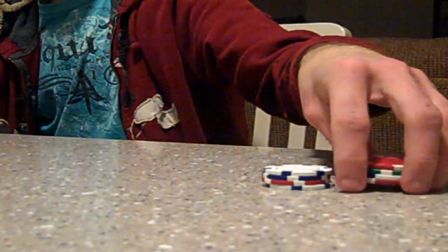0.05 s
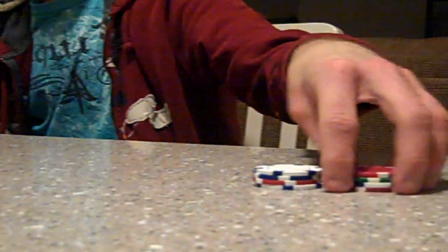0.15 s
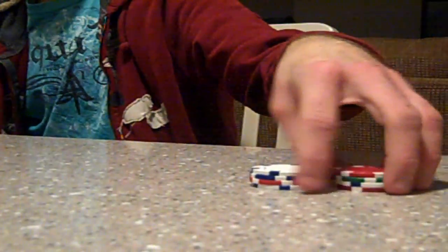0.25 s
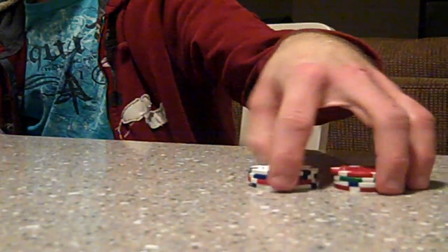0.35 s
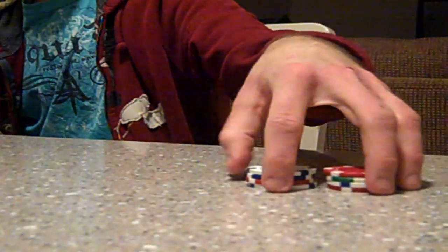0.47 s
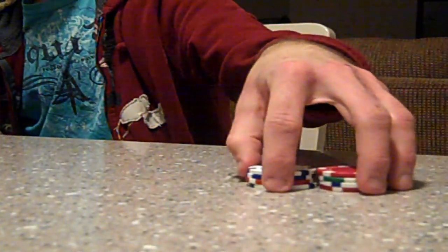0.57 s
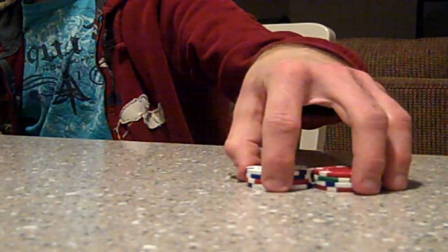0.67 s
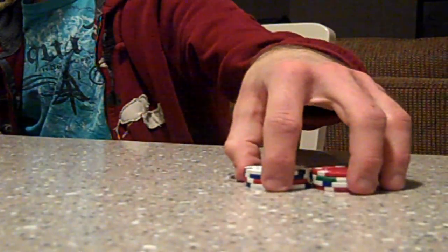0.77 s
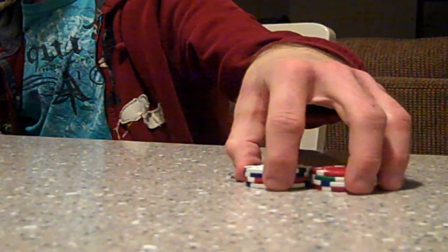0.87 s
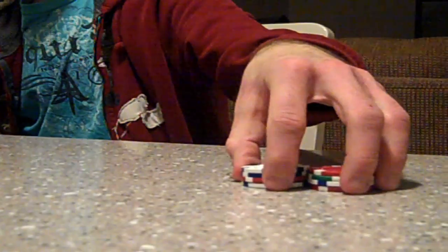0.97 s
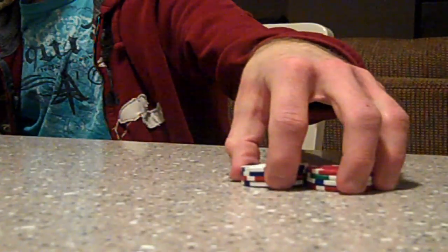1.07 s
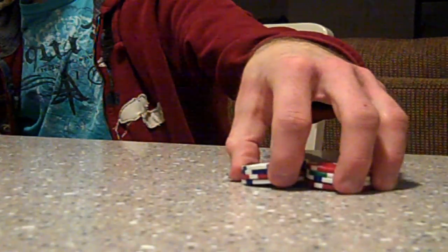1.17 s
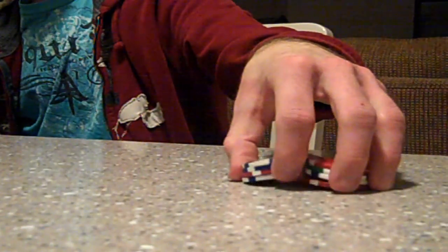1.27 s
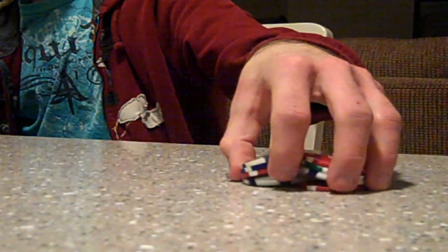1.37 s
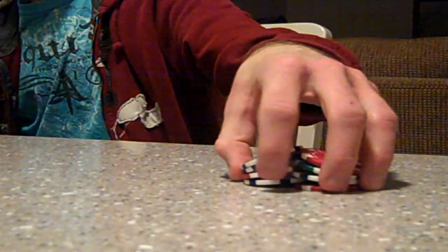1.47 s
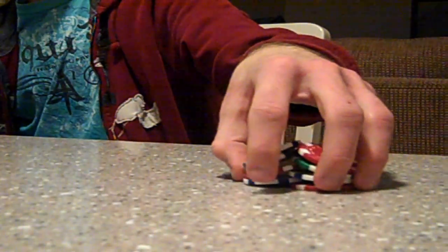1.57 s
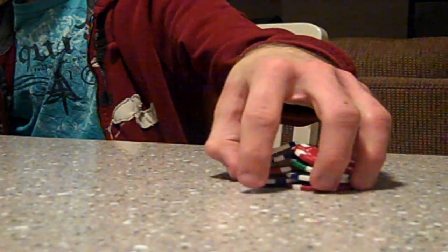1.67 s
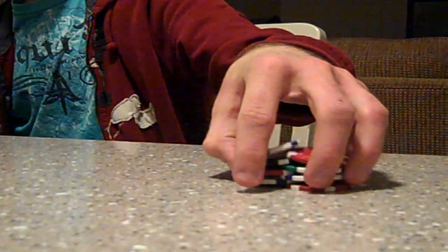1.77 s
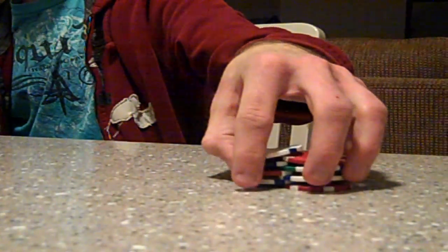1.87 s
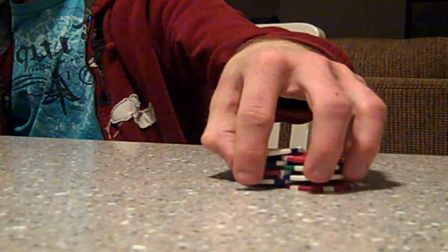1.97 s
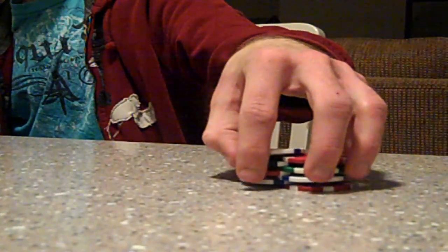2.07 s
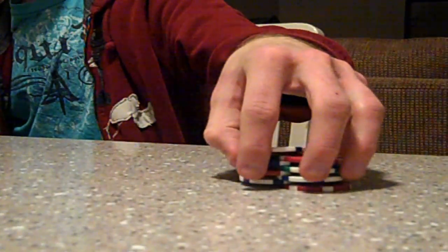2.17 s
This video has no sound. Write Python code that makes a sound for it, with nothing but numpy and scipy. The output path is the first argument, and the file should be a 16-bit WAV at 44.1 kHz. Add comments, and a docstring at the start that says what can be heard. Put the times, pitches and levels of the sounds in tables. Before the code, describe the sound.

Poker chips clatter sharply onto a hard tabletop, then clack and shuffle together with dull knocks

```python
"""Plastic poker chips in two short stacks, shuffled by a hand on a hard tabletop close to the microphone.
A few chips drop with a loud clatter; the stacks are nudged, lifted and clack into each other, then are
pushed together with duller knocks. Each contact is a noise crack, a hollow pop and damped sines for chip
and table; rubs are swarms of tiny contacts, bumps are deep table modes and rim ticks are filtered noise.
A small room rings on over steady hiss, and the loudest clacks overload the recorder."""
import sys
import numpy as np
from scipy import signal
from scipy.fft import rfft, irfft
from scipy.io import wavfile

SR = 44100
rng = np.random.default_rng(int(sys.argv[2]) if len(sys.argv) > 2 else 0)


def store_pcm(level_fs):
    """Save levels as 16-bit WAV."""
    pcm = np.round(np.clip(level_fs, -1, 1) * 32767).astype(np.int16)
    wavfile.write(sys.argv[1], SR, np.atleast_2d(pcm).T)


N = 97020
RING_SAMPLES = SR // 3

# Room tone and hiss. Each row: frequency in Hz, relative density in dB per Hz.
HUSH_SPECTRUM = [(25, 9), (45, 5), (70, 0.5), (100, 4), (140, 5.5), (200, 1.5), (300, -2.5), (450, -5.5),
                 (650, -5.5), (1000, -9.5), (2000, -12.5), (4000, -17.5), (8000, -20), (14000, -27)]
HUSH_DB = -54

# A rim just grazes another. Each row: start in seconds, level in dB.
RIM_TICKS = [(.1505, -28.5), (.1735, -57)]
TICK_LOW_HZ, TICK_HIGH_HZ, TICK_T60_S = 7000, 12500, .008

# Colour of the room's tail. Each row: frequency in Hz, relative level in dB.
ROOM_COLOUR = [(80, -1), (250, 3.5), (650, 0), (1200, 3), (2000, -4.5), (3500, -4), (5000, -0.5),
               (7500, -4.5), (10000, 1.5), (14000, -3.5)]
# Decay of the room's tail. Each row: frequency in Hz, t60 in seconds.
ROOM_DECAY = [(100, 0.53), (700, 0.74), (2000, .58), (5000, .56), (8000, .52), (10000, 0.32), (13000, 0.4)]
ROOM_DB, ROOM_FADE_IN_S = -18.5, .005
EARLY_DB, EARLY_T60_S, EARLY_DELAY_S = -11.5, 0.058, 0.0023

# Loose chips drop on their stack. Each row: start in seconds, level in dB, contact brightness in Hz,
# table knock in dB relative to the level, pitch of the pop in Hz.
CHIP_DROPS = [(.2108, -30, 6033, -7, 1850), (.2132, 9, 4500, -15.5, 1934), (.2150, 9, 13000, -14, 6540),
              (.2166, 1, 13000, -10, 6980), (.2195, -7, 9000, -7, 4522), (.2238, -4.5, 8000, -5.5, 2590),
              (.2250, 7, 6000, -11, 1936), (.2290, -3.5, 7000, -1.5, 2800), (.2327, -0.5, 12000, -10, 7005),
              (.2347, -11.5, 8970, -6.5, 2000), (.2381, 0.5, 12000, -11.5, 6860),
              (.2410, -8, 10000, -7.5, 4700)]
# Chips held in the fingers clack together. Each row: start in seconds, level in dB,
# contact brightness in Hz, table knock in dB relative to the level, pitch of the pop in Hz.
HELD_CLACKS = [(.7110, -37.5, 1817, 10, 908), (.7600, -31, 1300, 3.5, 649), (.7760, -38, 1305, 2, 650),
               (1.2280, -39, 2000, 0, 1070), (1.4050, -35.5, 1800, -3, 1950), (1.4331, 3.5, 3540, -8, 2534),
               (1.4341, -3, 7300, 0.5, 6390), (1.4364, -12, 2490, 2, 2250), (1.4470, -32, 4000, 18.5, 650),
               (1.4595, -33, 8060, 9, 5000), (1.4692, -27, 11000, -9, 7800), (1.4840, -32, 3000, 12, 650),
               (1.4963, 3, 8500, -20, 1590), (1.4980, 5, 11000, -11, 7390), (1.5003, -7, 11000, -1.5, 4920),
               (1.5110, -25.5, 7000, 13.5, 5240), (1.5272, -2, 7000, -5.5, 2840),
               (1.5283, 0.5, 7000, -13, 5800), (1.5333, -9.5, 8000, 0.5, 5280),
               (1.5400, -17, 9000, 0, 5600), (1.6385, -23, 1860, 9.5, 1880), (1.6845, -24.5, 2200, 3, 2010),
               (1.8092, -11.5, 1600, -2.5, 2060), (1.8160, -13.5, 4110, 1.5, 1885),
               (1.8225, -19.5, 2760, -5, 1960), (1.8380, -45, 6000, -2, 5200),
               (1.8458, -10.5, 3990, 3, 1536), (1.8470, -11, 4500, -17, 2910),
               (1.8495, -12, 2000, -3, 1700), (1.8648, -17.5, 4840, 3, 1850),
               (1.8762, -21, 5020, 12.5, 4450), (1.9161, -8, 3170, -0.5, 1883),
               (1.9225, -17.5, 2300, 1, 2250), (1.9680, -39, 2000, 13, 1800), (2.0270, -34, 1500, 7, 700),
               (2.0825, -36, 2000, -4, 1880), (2.1080, -38, 2180, 12.5, 1980),
               (2.1212, -13.5, 3140, -4.5, 2790), (2.1280, -17.5, 2520, -1, 2610),
               (2.1870, -27.5, 1800, 0.5, 1700)]
# Chips rub on each other and on the table. Each row: start in seconds, length in seconds, level in dB,
# contact brightness in Hz, table knock in dB relative to the level, pitch of the pop in Hz.
CHIP_RUBS = [(0.59, .035, -57, 3000, -6, 2310), (.950, 0.033, -51.5, 9000, 4.5, 2240),
             (1.161, 0.023, -57, 4000, 1, 2050), (1.359, .03, -51, 1500, 2, 1200),
             (1.384, 0.041, -45.5, 1600, 7.5, 1900), (1.444, 0.15, -45.5, 5000, 13, 5100),
             (1.633, 0.048, -36.5, 2010, -1, 1920), (1.803, 0.097, -32.5, 3800, 3.5, 2010),
             (1.929, 0.039, -45.5, 2200, 4, 2000), (2.118, 0.059, -43, 2190, 0, 1840)]
GRAINS_PER_S, GRAIN_SPREAD_DB = 1400, 5   # density over all rubbing chips, spread of grain level
# Fingers and stacks bump the table dully. Each row: start in seconds, level in dB.
TABLE_BUMPS = [(.850, -46), (1.124, -50.5), (1.223, -58), (1.436, -30.5), (1.528, -30.5), (1.660, -37),
               (1.917, -22), (1.961, -32), (2.085, -39), (2.122, -26.5), (2.177, -35.5)]

# Modes are nominal: every blow varies their pitch and level.
# Modes of a loose chip. Each row: frequency in Hz, level in dB, t60 in seconds.
LOOSE_CHIP_MODES = [(1780, -17.5, 0.0092), (1897, -16, 0.0093), (2430, -15.5, 0.019), (2843, -13.5, .012),
                    (3450, -14, 0.0069), (4410, -15, .009), (5100, -14, 0.016), (5510, -16.5, 0.0091),
                    (6062, -6.5, 0.013), (6712, -7.5, 0.019), (7326, -4.5, .02), (7720, -3, 0.01),
                    (8745, -13.5, 0.01), (9900, -13, 0.0074), (11850, -13.5, 0.0074), (12770, -16.5, 0.011)]
# Modes of a chip held in the fingers. Each row: frequency in Hz, level in dB, t60 in seconds.
HELD_CHIP_MODES = [(1360, -29, 0.039), (1658, -17, 0.0096), (2000, -14.5, 0.023), (2477, -15.5, 0.016),
                   (3026, -15.5, 0.01), (4500, -25, 0.0059), (5173, -9, 0.014), (5667, -9.5, 0.018),
                   (6100, -9, 0.0094), (7607, -8.5, .02), (7980, -6.5, 0.008), (8250, -16, 0.004),
                   (9900, -15.5, 0.011), (10700, -13.5, 0.0053)]
# Table modes that ring in a knock. Each row: frequency in Hz, level in dB, t60 in seconds.
TABLE_KNOCK_MODES = [(140.7, -41.5, .2), (224.5, -32.5, 0.064), (337, -32, .06), (363, -29.5, 0.082),
                     (477, -23, 0.052), (557, -15, 0.021), (624, -24.5, 0.18), (694, -17.5, 0.033),
                     (765, -22, .04), (900, -22.5, 0.032), (1075, -25.5, 0.043)]
# Deep modes of the table. Each row: frequency in Hz, level in dB, t60 in seconds.
TABLE_DEEP_MODES = [(98, -22.5, .2), (144, -13, 0.17), (187, -11, 0.088), (218.4, -5.5, 0.062),
                    (287, -5, .06), (361.2, -12, 0.25)]
MODE_SPREAD_DB, DETUNE = 2.0, .035   # each contact lands on a different spot; detune is a fraction

CRACK_DB, CRACK_T60_S = -9, .005   # the burst at the moment of contact
POP_DB, POP_T60_S = -5.5, .012   # the short hollow pop of two flat faces meeting
HOLLOW_HZ, HOLLOW_Q = 3833, 10   # a chip radiates poorly between its low and high modes
DISC_LOW_HZ = 616   # a small disc radiates little bass

MIC_TOP_HZ, MIC_LOW_HZ, CUTOFF_HZ = 14300, 95, 16500
OVERLOAD, OVERLOAD_KNEE = 1.0, 8   # ceiling in amplitude; a higher knee bends more sharply


def from_db(db):
    """Decibels to gain."""
    return 10 ** (np.asarray(db) / 20)


def at_hz(points, hz):
    """Read a table on a log-frequency axis."""
    f, value = np.transpose(points)
    return np.interp(np.log(np.maximum(hz, 1)), np.log(f), value)


def dying(t, t60):
    """An exponential decay that falls 60 dB in t60 seconds."""
    return np.exp(-np.log(1000) * t / t60)


def add(out, s, sound):
    """Mix a sound in at its time."""
    i = int(s * SR)
    out[i:i + len(sound)] += sound[:N - i]


def coloured(x, spectrum):
    """Give a noise a spectrum."""
    gain = from_db(at_hz(spectrum, np.fft.rfftfreq(len(x), 1 / SR)))
    return irfft(rfft(x) * gain, len(x))


def hush():
    """Steady room tone and microphone hiss: noise with a fixed spectrum."""
    noise = coloured(rng.standard_normal(N), HUSH_SPECTRUM)
    return from_db(HUSH_DB) * noise / noise.std()


def ticks():
    """Thin, bright rim ticks: short noise bursts with only their treble left."""
    out, t = np.zeros(N), np.arange(RING_SAMPLES) / SR
    thin = signal.butter(2, [TICK_LOW_HZ, TICK_HIGH_HZ], "band", fs=SR, output="sos")
    for s, db in RIM_TICKS:
        burst = rng.standard_normal(len(t)) * dying(t, TICK_T60_S)
        add(out, s, from_db(db) * signal.sosfilt(thin, burst))
    return out


def room(x):
    """Quick reflections off hand, body and table, then a diffuse tail whose high treble dies sooner."""
    t = np.arange(SR) / SR
    near, far = rng.standard_normal((2, SR))
    early = near * dying(t, EARLY_T60_S) * (t > EARLY_DELAY_S)
    far_spectrum = rfft(coloured(far, ROOM_COLOUR))
    hz = np.fft.rfftfreq(SR, 1 / SR)
    edges = np.geomspace(60, 16000, 28)
    tail = np.zeros(SR)
    for lo, hi in zip(edges, edges[1:]):
        band = irfft(far_spectrum * ((hz >= lo) & (hz < hi)), SR)
        tail += band * dying(t, at_hz(ROOM_DECAY, np.sqrt(lo * hi)))
    tail = tail * np.minimum(t / ROOM_FADE_IN_S, 1) ** 2
    # equal energy first, so that the two levels compare
    response = from_db(EARLY_DB) * early / np.linalg.norm(early)
    response += from_db(ROOM_DB) * tail / np.linalg.norm(tail)
    return signal.fftconvolve(x, response)[:N]


def ringing(modes):
    """One blow on a body: damped sines, each with a strength, sign and slight detuning of its own."""
    hz, db, t60 = np.transpose(modes)[:, :, None]
    strength, detune, sign = rng.standard_normal((3, len(modes), 1))
    t = np.arange(RING_SAMPLES) / SR
    gain = np.sign(sign) * from_db(db + MODE_SPREAD_DB * strength)
    sines = np.sin(2 * np.pi * hz * (1 + DETUNE * detune) * t)
    return np.sum(gain * dying(t, t60) * sines, axis=0)


def contact(chip, bright_hz, table_db, pop_hz):
    """A chip cracks and rings, duller for a soft touch; the faces pop and the table knocks under them."""
    t = np.arange(RING_SAMPLES) / SR
    crack = from_db(CRACK_DB) * rng.standard_normal(len(t)) * dying(t, CRACK_T60_S)
    softness = signal.butter(2, bright_hz, fs=SR, output="sos")
    struck = signal.sosfilt(softness, ringing(chip) + crack)
    pop = from_db(POP_DB) * np.sin(2 * np.pi * pop_hz * t) * dying(t, POP_T60_S)
    hollow = signal.iirnotch(HOLLOW_HZ, HOLLOW_Q, fs=SR)
    disc = signal.lfilter(*hollow, struck + pop)
    disc = signal.sosfilt(signal.butter(1, DISC_LOW_HZ, "high", fs=SR, output="sos"), disc)
    return disc + from_db(table_db) * ringing(TABLE_KNOCK_MODES)


def clacks(rows, chip):
    """Single contacts of chips, loose or held, each struck afresh."""
    out = np.zeros(N)
    for s, db, bright_hz, table_db, pop_hz in rows:
        add(out, s, from_db(db) * contact(chip, bright_hz, table_db, pop_hz))
    return out


def rubs(count=5):
    """Sliding rims catch and slip in a swell of tiny contacts, spread over several chips."""
    out, t = np.zeros(N), np.arange(RING_SAMPLES) / SR
    for s, length, db, bright_hz, table_db, pop_hz in CHIP_RUBS:
        swell = np.sqrt(np.abs(np.sin(np.pi * np.minimum(t / length, 1))))
        for _ in range(count):
            chance = rng.random(RING_SAMPLES)
            sign, strength = rng.standard_normal((2, RING_SAMPLES))
            catches = chance < GRAINS_PER_S / count / SR
            grains = swell * catches * np.sign(sign) * from_db(GRAIN_SPREAD_DB * strength)
            touch = contact(HELD_CHIP_MODES, bright_hz, table_db, pop_hz)
            add(out, s, from_db(db) * signal.fftconvolve(grains, touch))
    return out


def bumps():
    """Soft, heavy touches wake only the deep modes of the table."""
    out = np.zeros(N)
    for s, db in TABLE_BUMPS:
        add(out, s, from_db(db) * ringing(TABLE_DEEP_MODES))
    return out


def scene():
    """Chips and table in the room, over the hush."""
    drops = clacks(CHIP_DROPS, LOOSE_CHIP_MODES)
    held = clacks(HELD_CLACKS, HELD_CHIP_MODES)
    chips = ticks() + drops + rubs() + held + bumps()
    return (chips + room(chips) + hush())[None]


def record(dry):
    """The microphone loses top and deep bass, loud peaks are flattened, and the band is cut."""
    x = signal.sosfilt(signal.ellip(8, .3, 70, MIC_TOP_HZ, fs=SR, output="sos"), dry)
    x = signal.sosfilt(signal.butter(2, MIC_LOW_HZ, "high", fs=SR, output="sos"), x)
    x = x / (1 + np.abs(x / OVERLOAD) ** OVERLOAD_KNEE) ** (1 / OVERLOAD_KNEE)
    return signal.sosfilt(signal.butter(12, CUTOFF_HZ, fs=SR, output="sos"), x)


dry = scene()
out = record(dry)
store_pcm(out)
```